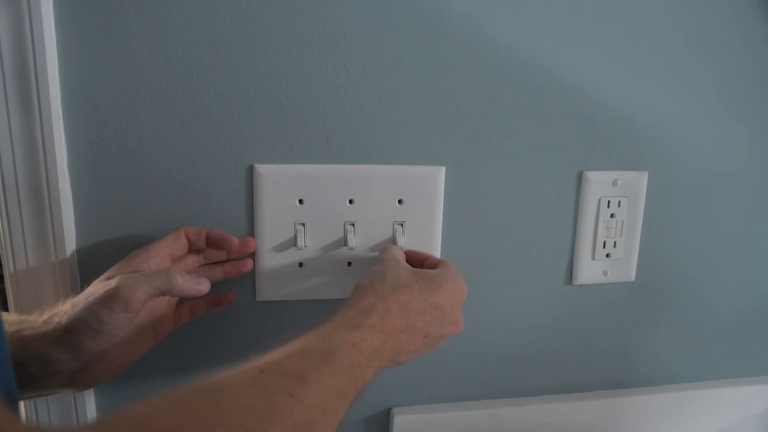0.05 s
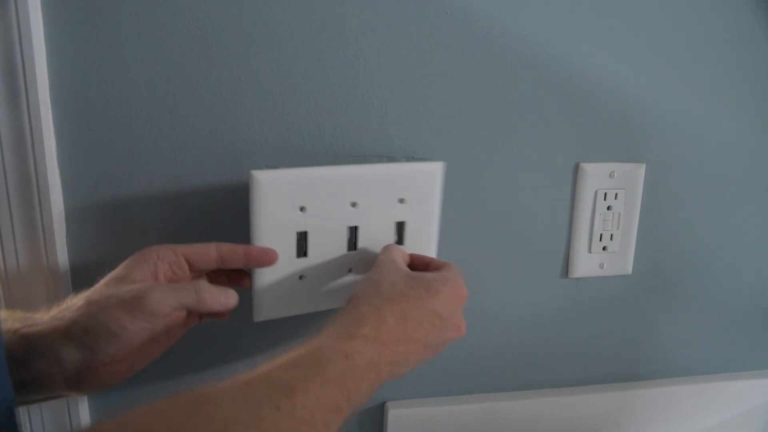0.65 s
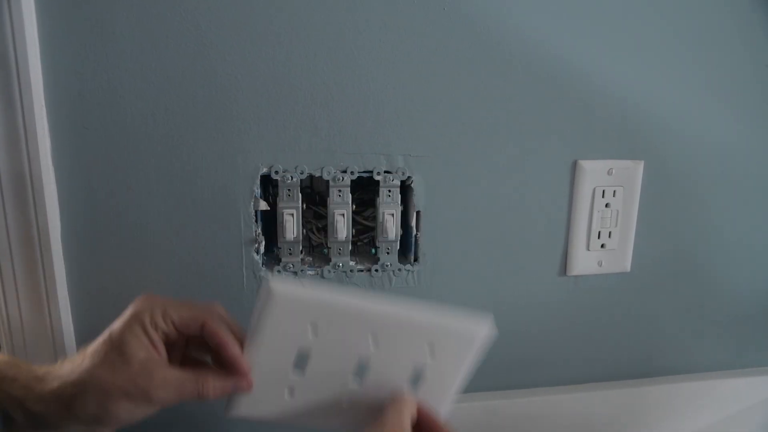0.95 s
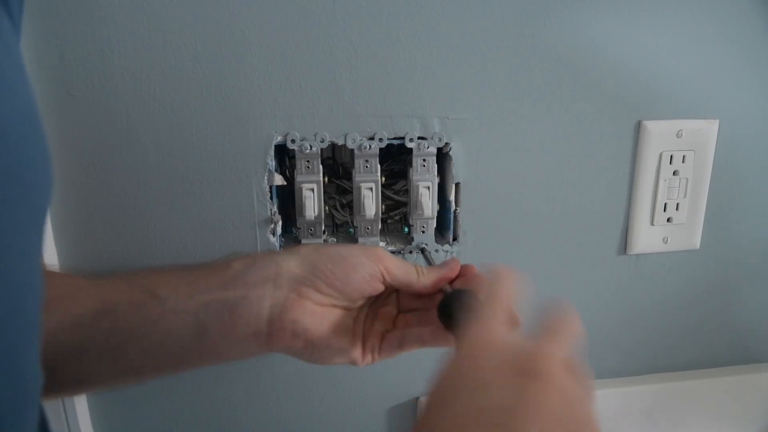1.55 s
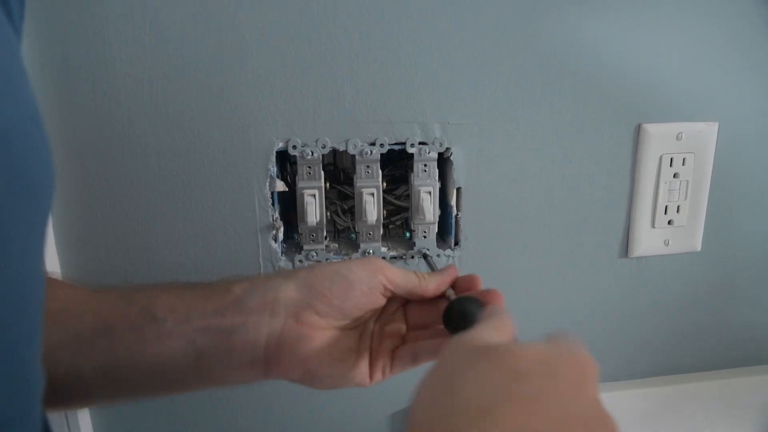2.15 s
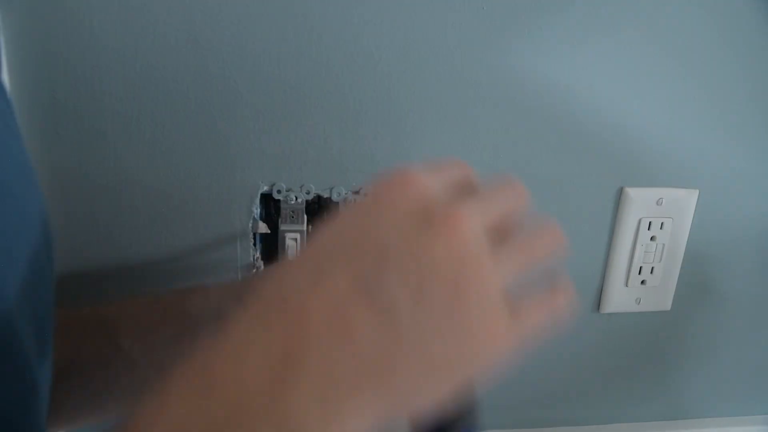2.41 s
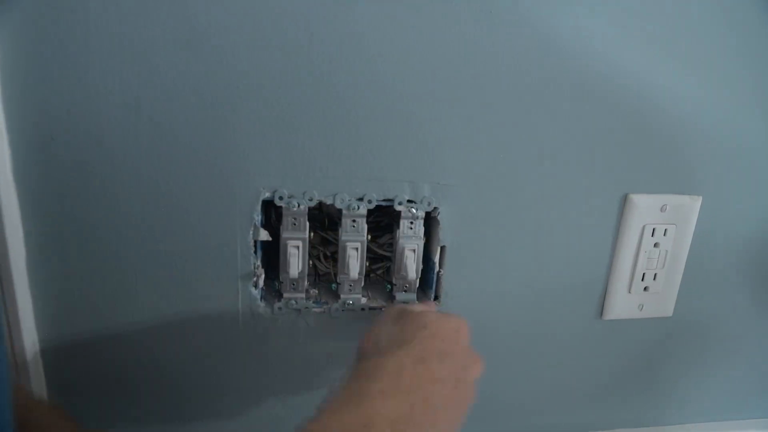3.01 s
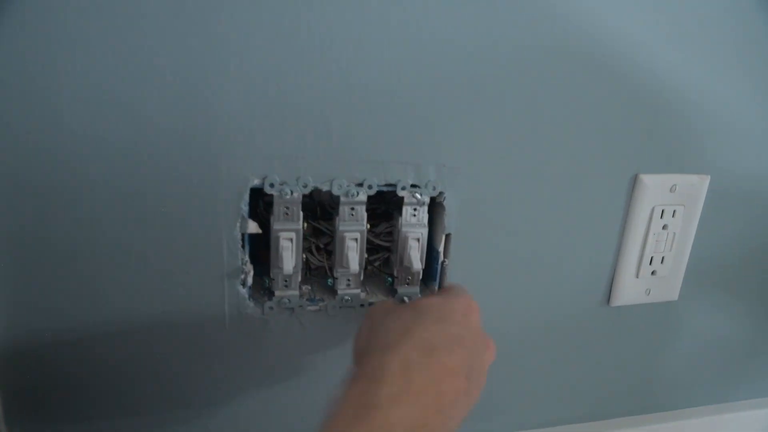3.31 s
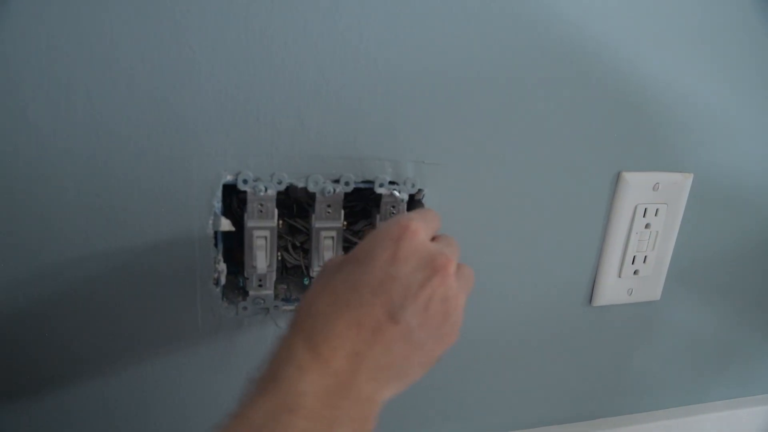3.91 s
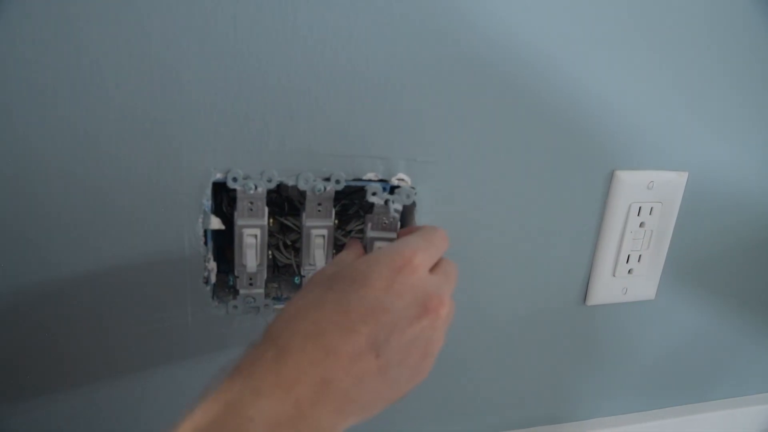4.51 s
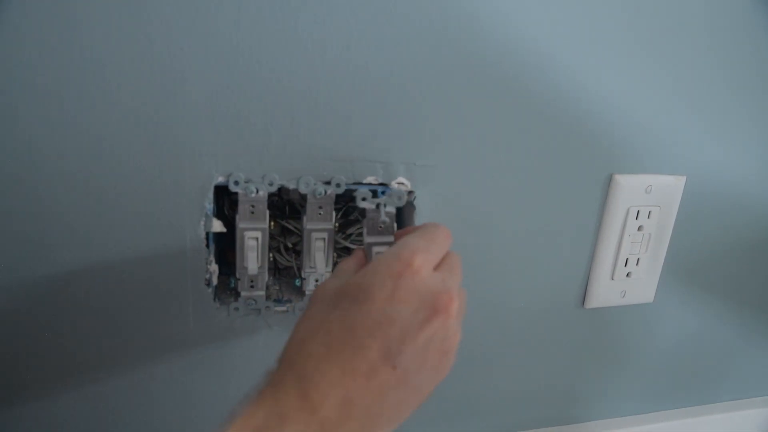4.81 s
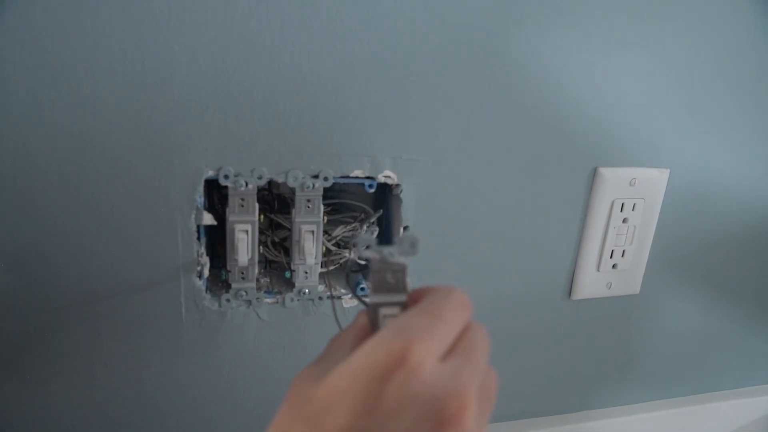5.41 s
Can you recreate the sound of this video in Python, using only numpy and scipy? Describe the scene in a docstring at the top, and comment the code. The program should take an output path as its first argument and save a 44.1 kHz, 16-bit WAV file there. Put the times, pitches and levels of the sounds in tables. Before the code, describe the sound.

Plastic clatter, a dry click and faint screw turning, then knocks and a metal scrape as a wall switch is pulled out.

```python
"""A small room with a switch box in a hollow wall. A plastic cover plate clatters off, there is one dry pop,
a screwdriver turns and a screw squeaks. Fingers work the switch loose: it breaks free with a thump of the
wall, its metal strap scrapes and sings out of the box, and it knocks twice on its stiff wires.
Impacts excite the damped modes of the parts and the wall; friction is a train of tiny slips, and
stick-slip makes the metal sing. A steady rumble and hiss lie underneath."""
import sys
import numpy as np
from scipy import signal
from scipy.fft import rfft, irfft
from scipy.io import wavfile

SR = 44100
rng = np.random.default_rng(int(sys.argv[2]) if len(sys.argv) > 2 else 0)


def store_pcm(level_fs):
    """Save levels as 16-bit WAV."""
    pcm = np.round(np.clip(level_fs, -1, 1) * 32767).astype(np.int16)
    wavfile.write(sys.argv[1], SR, np.atleast_2d(pcm).T)


N = 249253
TIME = np.arange(N) / SR
LEAD = 512  # samples ahead of a click, so that filters have space to spread

# Coherence of the sound field. Each row: frequency in Hz, left-right correlation.
COHERENCE = [(100, 1), (400, 1), (1000, .93), (2100, 0.24), (4200, 0.028), (9000, 0.017), (16000, 0.029)]
# Faint drones of the room. Each row: frequency in Hz, width in Hz, level in dB.
DRONES = [(80.5, 9, -64.5), (118.85, 6.7, -63), (276.7, 85, -67), (964, 45, -70.5)]
# Impacts. Each row: start in seconds, body level in dB, hardness (treble over body) in dB,
# chatter time in seconds, ring centre in Hz, push on the wall over body in dB.
CONTACTS = [(0.0431, -37, -10, 0.0033, 1740, -7), (.121, -26.5, -3, 0.0068, 2620, 3.5),
            (.1286, -29.5, -2.5, 0.013, 780, 5.5), (.167, -33.5, -1, 0.027, 1460, 10),
            (.24, -38, -10.5, 0.04, 1310, -3), (.298, -45, -11, 0.058, 2500, 13),
            (0.3434, -31.5, -13, 0.0078, 1000, -5.5), (0.4843, -48, -4.5, 0.017, 910, 1),
            (.5437, -30, -0.5, .018, 1360, -10), (.55, -28, -2.5, 0.02, 1200, 4),
            (1.384, -55, -14, 0.0041, 1600, -8), (2.421, -44.5, 6.5, 0.0042, 1070, 1),
            (2.7433, -41, -16, 0.01, 1060, -4), (2.888, -47, -28, 0.0045, 880, -8),
            (2.927, -49, -14.5, 0.0048, 930, -8), (3.1518, -57.5, -2, 0.004, 2500, -6),
            (3.333, -42.5, -35, 0.0045, 1020, -8), (3.411, -48.5, -41, 0.0034, 925, -15),
            (3.616, -48.5, -2.5, 0.0041, 1400, -6), (3.771, -49.5, -2.5, 0.0082, 1290, 5),
            (3.8759, -40.5, -1, 0.0041, 2550, -9), (3.984, -42.5, -11.5, 0.0058, 900, 5),
            (4.0453, -44.5, -7.5, 0.016, 1300, 6), (4.1454, -24, -7.5, 0.012, 1290, 5),
            (4.153, -23, -17, 0.021, 560, 12), (4.172, -28.5, -12, 0.0079, 985, 9.5),
            (4.187, -23.5, -14, .012, 500, 6), (4.225, -32, -13, 0.013, 650, 5),
            (4.254, -29.5, 8, .006, 4900, 1), (4.278, -35, -13, 0.0077, 700, 21),
            (4.308, -41.5, 10.5, 0.021, 920, 7), (4.708, -49.5, -7, 0.0041, 1860, -5),
            (4.751, -42.5, -35, 0.0085, 900, -1), (4.862, -19.5, -11, 0.0041, 710, -2.5),
            (4.884, -33, -4, 0.0075, 690, 2), (4.9666, -25, 0.5, 0.0028, 950, 6.5),
            (4.974, -33.5, -18, 0.019, 690, 9), (5.0958, -41, -32, 0.003, 776, -1),
            (5.309, -47, -12.5, 0.0042, 594, 13)]
# Normal modes. Each row: frequency in Hz, level in dB, time to fall 60 dB in seconds.
PART_MODES = [(415, 1, 0.069), (468, -2, 0.03), (514, 3.5, 0.046), (610, -2.5, 0.037), (648, 2.5, 0.019),
              (689, 2, 0.033), (751, 1, 0.033), (844, -4.5, 0.022), (988, -4.5, 0.039), (1120, -33, 0.037),
              (1195, -7.5, 0.023), (1250, -15, 0.031), (1392, -13, 0.03), (1420, -16, 0.03),
              (1470, 4, 0.021), (1730, -12, 0.055), (2200, 6, 0.018), (2528, 6, 0.023), (2926, -2, 0.0088),
              (3610, 13.5, 0.0057), (4200, -6, 0.016), (4560, -19, 0.025), (5500, -34, .015)]  # plate, strap and box
WALL_MODES = [(42, -5, .2), (90.3, -2.5, 0.09), (110.6, -10, 0.069), (136.1, -3, 0.18), (148, -6.5, 0.17),
              (177, -0.5, 0.087), (207, -1.5, 0.089), (229, 0, 0.097), (258.7, 3.5, 0.054), (287, 1, 0.1),
              (324, 0, 0.045), (407, -1.5, 0.068), (517, -8, 0.1)]
# Hard edges slipping off each other. Each row: start in seconds, level in dB, centre in Hz.
EDGE_SLIPS = [(.282, -31.5, 2700), (2.2664, -39, 15100), (3.8746, -30.5, 2640), (4.169, -19.5, 13900),
              (4.1993, -21, 12700), (4.2633, -7.5, 16000), (4.2633, -18, 4860), (4.8609, -21, 8650),
              (4.882, -20, 9600), (4.966, -18.5, 8400)]
# The screw grinding in its thread. Each row: time in seconds, level in dB.
GRIND_LEVELS = [(2.05, -65.5), (2.27, -56), (2.42, -65.5), (2.52, -54), (2.62, -64.5), (2.8, -61.5),
                (2.9, -96)]
# Screw squeaks. Each row: peak time in seconds, length in seconds, pitch in Hz, width in Hz, level in dB.
SCREW_SQUEAKS = [(2.12, .06, 12130, 200, -59.5), (2.178, 0.12, 11620, 250, -61),
                 (2.235, .06, 12450, 200, -62)]
# Hand movements. Each row: start in seconds, length in seconds, level in dB.
GRIP_SHIFTS = [(1.76, 0.33, -55), (3.47, 0.39, -53), (4.6, 0.22, -49.5), (5.04, 0.29, -54.5),
               (5.39, 0.076, -52), (5.488, 0.17, -43.5)]
STRAP_PULLS = [(4.13, 0.12, -35), (4.185, 0.34, -34.5)]
# Resonances of the strap. Each row: frequency in Hz, width in Hz, level over the pull in dB.
STRAP_MODES = [(2345, 87, -14.5), (4390, 120, -5), (5820, 160, -18)]
# Spectral envelopes of the sources. Each row: frequency in Hz, relative level in dB.
AIR_SPECTRUM = [(12, -51), (20, -16), (81, -2.5), (127, -5.5), (154, -13.5), (248, -13), (367, -13.5),
                (399, -14.5), (949, -19.5), (1760, -29), (2320, -27.5), (2820, -33.5), (3250, -31.5),
                (6010, -37), (16000, -36.5)]
KNOCK_SPECTRUM = [(350, -5), (520, -6.5), (750, 3), (1300, -3.5), (1800, -3), (2800, 4), (4400, -0.5),
                  (7000, -4), (11000, -1), (15500, 3)]
FINGER_SPECTRUM = [(1500, -22), (4000, -11), (8000, -8.5), (11000, -9), (14500, 1), (16000, 2.5)]
WIRE_SPECTRUM = [(90, -1.5), (280, 1), (500, -2.5), (1150, -6), (1900, -13), (2900, -14.5), (4400, -25),
                 (12000, -43)]
THREAD_SPECTRUM = [(500, -18), (1500, -1.5), (3000, -1.5), (5500, -3), (7500, -10), (11000, -9.5),
                   (16000, -6)]
DRAG_SPECTRUM = [(150, 0), (400, -12), (850, -13.5), (1900, -18.5), (2300, -8), (3200, -13), (4400, -6.5),
                 (6200, -12.5), (10000, -10), (16000, -12.5)]
# Overall gain with one brief dip; the end values hold outside it. Each row: time in seconds, gain in dB.
GAIN_DIP = [(2.282, 4), (2.289, -27), (2.32, -14), (2.355, -6.5), (2.385, 2.5)]


def amp(db):
    """Amplitude grows tenfold every 20 dB."""
    return 10 ** (np.asarray(db) / 20)


def unit(x):
    """Normalisation to an rms of 1."""
    return x / np.sqrt(np.mean(x ** 2) + 1e-20)


def read(points, hz):
    """Interpolation of a spectrum on a log-frequency axis."""
    f, value = np.transpose(points)
    return np.interp(np.log(hz + 1), np.log(f + 1), value)


def add(mix, s, sound):
    """Superposition: a sound joins the mix at s seconds."""
    part = mix[:, max(round(s * SR), 0):][:, :sound.shape[-1]]
    part += sound[..., :part.shape[1]]


def bins(size):
    """The Fourier frequencies of this many samples."""
    return np.fft.rfftfreq(size, 1 / SR)


def bump(hz, centre_hz, octaves):
    """A Gaussian band on the log-frequency axis."""
    return np.exp(-.5 * (np.log2((hz + 1) / centre_hz) / octaves) ** 2)


def wobble(rate_hz):
    """Random modulation around a rate, with an rms of 1."""
    return unit(irfft(rfft(rng.standard_normal(N)) * bump(bins(N), rate_hz, 1), N))


def stereo_spectra(noises):
    """Spatial coherence: two nearby points receive alike bass and unlike treble."""
    same = read(COHERENCE, bins(noises.shape[1]))
    mid, side = rfft(noises) * np.sqrt([(1 + same) / 2, (1 - same) / 2])
    return np.array([mid + side, mid - side])


def narrow_noise(hz, width_hz, size=N):
    """A steep resonance filters noise into a wavering tone."""
    noise = stereo_spectra(rng.standard_normal((2, size)))
    return unit(irfft(noise / (1 + ((bins(size) - hz) / width_hz * 2) ** 4), size))


def room(size, near_db=4, near_t60=0.036, tail_db=-3.5, tail_t60=0.24, build_s=0.0065):
    """The room's transfer function: direct sound, scatter from hands and wall, a reverberant tail."""
    t = np.arange(size) / SR
    near, tail = rng.standard_normal((2, 2, size))
    near = unit(near * amp(-60 * t / near_t60))
    tail = unit(tail * amp(-60 * t / tail_t60) * (1 - np.exp(-(t / build_s) ** 2)))
    return 1 + stereo_spectra(amp(near_db) * near + amp(tail_db) * tail) / np.sqrt(size)


def strokes(rows, power):
    """Amplitude envelope of hand movements: each is a half sine raised to a power."""
    return sum(amp(db) * np.sin(np.pi * np.clip((TIME - s) / length, 0, 1)).clip(0) ** power
               for s, length, db in rows)


def friction(gain, spectrum, slips_per_s, spread_db, catch_db, catch_hz=70):
    """Sliding friction is a random train of tiny uneven slips, bunched into catches."""
    sizes_db = spread_db * np.minimum(rng.exponential(1, N), 4) + catch_db * wobble(catch_hz)
    slips = amp(sizes_db) * rng.standard_normal(N) * (rng.random(N) < slips_per_s / SR)
    return gain * unit(irfft(rfft(slips) * amp(read(spectrum, bins(N))) * room(N), N))


def air(level_db=-52.5, hiss_db=-2):
    """Ambient noise: a broadband rumble and hiss with a few narrowband drones."""
    hz = bins(N)
    colour = amp(read(AIR_SPECTRUM, hz) + hiss_db * bump(hz, 13400, 0.83))
    wash = amp(level_db) * unit(irfft(stereo_spectra(rng.standard_normal((2, N))) * colour, N))
    return wash + sum(amp(db) * narrow_noise(f, width) for f, width, db in DRONES)


def part_resonance(size, detune=0.0053):
    """Modal response of plate, strap and box; each new grip shifts the modes a little."""
    t, hz = np.arange(size // 4) / SR, bins(size)
    mode_hz, mode_db, t60 = np.transpose(PART_MODES)[:, :, None]
    held_hz = mode_hz * (1 + detune * rng.standard_normal(mode_hz.shape))
    sign = rng.choice([-1, 1], mode_hz.shape)
    modes = sign * amp(mode_db - 60 * t / t60) * np.sin(2 * np.pi * held_hz * t)
    ring = rfft(modes.sum(0), size)
    return ring / np.sqrt(np.mean(abs(ring[(hz > 500) & (hz < 5000)]) ** 2))


def knock(body_db, hardness_db, chatter_s, centre_hz, size=16384, slips_per_s=6000, ring_db=-6, focus_db=5):
    """Impact excitation: a click and a dying chatter of smaller ones ring the parts."""
    t, hz = np.arange(size) / SR, bins(size)
    colour = amp(read(KNOCK_SPECTRUM, hz) + focus_db * bump(hz, centre_hz, octaves=0.3))
    response = (1 + amp(ring_db) * part_resonance(size)) * colour
    slips = rng.uniform(-0.98, 1, size) * (rng.random(size) < slips_per_s / SR)
    graze = 0.28 * np.exp(-t[::-1] / 0.0018)  # wraps round to just before the parts meet
    chatter = np.exp(-t / chatter_s) * (1 - np.exp(-t / 0.002))
    slips *= graze + chatter
    slips[0] = 0.79  # the main click
    spectrum = rfft(np.roll(slips, LEAD)) * response * room(size)
    above = [1 / (1 + (edge_hz / (hz + 1)) ** 16) for edge_hz in (330, 1600, 6000)]
    bands = np.sqrt([above[0] - above[1], above[1] - above[2], above[2]])  # body, crack, treble
    levels_db = body_db + np.array([0, 0.58 * hardness_db - 1.5, hardness_db])
    sound = sum(amp(db) * unit(irfft(spectrum * band)) for band, db in zip(bands, levels_db))
    return sound * np.sqrt(.01 * SR / size)  # levels count the energy as if it fell within 10 ms


def wall_thump(peak_db, chatter_s, size=16384, rise_s=0.0037, wet_db=-8):
    """A push excites the wall panel's modes; a shorter contact favours the higher ones."""
    t = np.arange(size) / SR
    centre_hz = 272 * (0.0041 / chatter_s) ** 0.36
    boom = sum(amp(db - 60 * t / t60) * bump(f, centre_hz, octaves=0.75) * np.sin(2 * np.pi * f * t)
               for f, db, t60 in WALL_MODES)
    boom = np.roll(boom * (1 - np.exp(-t / rise_s)), LEAD)
    boom *= amp(peak_db) / abs(boom).max()
    return boom + amp(wet_db) * irfft(rfft(boom) * (room(size) - 1))


def impacts(wall_lag_s=.004):
    """Structural coupling: each contact rattles the parts, and the hollow wall gives way just after."""
    out = np.zeros((2, N))
    for s, body_db, hardness_db, chatter_s, centre_hz, push_db in CONTACTS:
        add(out, s - LEAD / SR, knock(body_db, hardness_db, chatter_s, centre_hz))
        add(out, s + wall_lag_s - LEAD / SR, wall_thump(body_db + push_db, chatter_s))
    return out


def edge_snaps(size=16384, decay_s=0.0015, wet_db=-6, coherence=0.49):
    """Sudden release: hard edges catch and slip, radiating a very short burst of noise."""
    t, out = np.arange(size) / SR, np.zeros((2, N))
    fade = np.exp(-t / decay_s)
    for s, db, centre_hz in EDGE_SLIPS:
        shared = np.sqrt(coherence) * rng.standard_normal(size)
        noise = shared + np.sqrt(1 - coherence) * rng.standard_normal((2, size))
        band = irfft(rfft(noise) * bump(bins(size), centre_hz, octaves=0.68))
        burst = amp(db) * unit(band * fade) * np.sqrt(np.mean(fade ** 2))
        burst = np.roll(burst, LEAD, axis=1)
        add(out, s - LEAD / SR, burst + amp(wet_db) * irfft(rfft(burst) * (room(size) - 1)))
    return out


def pop(at_s=1.2498, hz=1650, swing_db=-21.5, tick_db=-31, tick_decay_s=0.00078, size=256):
    """A dry click: one cycle with a faint tick and no ring."""
    t, out = (np.arange(size) - size // 2) / SR, np.zeros((2, N))
    swing = -np.sin(2 * np.pi * hz * t) * (abs(t) * hz < .5)
    tick = rng.standard_normal((2, size)) * np.exp(-abs(t) / tick_decay_s)
    add(out, at_s - size / 2 / SR, amp(swing_db) * swing + amp(tick_db) * tick)
    return out


def screwdriver(start_s=1.305, every_s=0.129, length_s=0.13, stroke_db=-58.5, count=6):
    """Sliding friction: fingers twirl the tool in even strokes, then rub along as the thread grinds."""
    twirl = strokes([(start_s + k * every_s, length_s, stroke_db) for k in range(count)], power=1.2)
    turn = amp(np.interp(TIME, *np.transpose(GRIND_LEVELS), left=-120, right=-120))
    rub = friction(twirl + amp(-3) * turn, FINGER_SPECTRUM, slips_per_s=2200, spread_db=4, catch_db=3.5)
    grind = friction(turn, THREAD_SPECTRUM, slips_per_s=6000, spread_db=1.5, catch_db=2.5)
    return rub + grind


def wires():
    """Friction noise: hand and stiff wires rustle with each shift of the grip."""
    grip = strokes(GRIP_SHIFTS, power=0.49)
    return friction(grip, WIRE_SPECTRUM, slips_per_s=2500, spread_db=2.5, catch_db=2.5)


def screw_squeaks(size=16384):
    """Stick-slip makes the screw sing in short swells of a fuzzy tone."""
    t, out = (np.arange(size) - size // 2) / SR, np.zeros((2, N))
    for s, length, hz, width_hz, db in SCREW_SQUEAKS:
        swell = np.cos(np.pi * np.clip(t / length, -.5, .5))
        tone = unit(swell * narrow_noise(hz, width_hz, size)) * np.sqrt(np.mean(swell ** 2))
        add(out, s - size / 2 / SR, amp(db) * tone)
    return out


def fingertips(span_s=(2.55, 6.7), slots=14, mean_db=-53.5, spread_db=3):
    """Weak impacts: fingertips tap the switch at loose intervals until the scene ends."""
    out = np.zeros((2, N))
    for k in range(slots):
        s = np.interp(k + rng.random(), [0, slots], span_s)
        body_db = mean_db + spread_db * rng.standard_normal()
        add(out, s, knock(body_db, hardness_db=-8.5, chatter_s=0.0069, centre_hz=1250))
    return out


def strap(stick_db=5, stick_hz=25):
    """Stick-slip drives the metal strap's resonances as two pulls rasp it along the box."""
    pull = strokes(STRAP_PULLS, power=2.16)
    rasp = friction(pull, DRAG_SPECTRUM, slips_per_s=14000, spread_db=1.5, catch_db=3)
    song = np.zeros((2, N))
    for hz, width_hz, db in STRAP_MODES:
        flutter = amp(stick_db * np.tanh(wobble(stick_hz)))
        song += amp(db) * unit(flutter * narrow_noise(hz, width_hz))
    return rasp + pull * song


def scene():
    """Superposition: all the sounds add."""
    return (air() + impacts() + edge_snaps() + pop() + strap()
            + screwdriver() + screw_squeaks() + wires() + fingertips())


def record(dry, ceiling=.8, cutoff_hz=16100):
    """The level dips briefly once, soft saturation rounds the peaks, and a low-pass limits the band."""
    dipped = dry * amp(np.interp(TIME, *np.transpose(GAIN_DIP)))
    rounded = ceiling * np.tanh(dipped / ceiling)
    lowpass = signal.firwin(511, cutoff_hz, window=("kaiser", 8), fs=SR)
    return signal.oaconvolve(rounded, lowpass[None], "same")


dry = scene()
out = record(dry)
store_pcm(out)
```